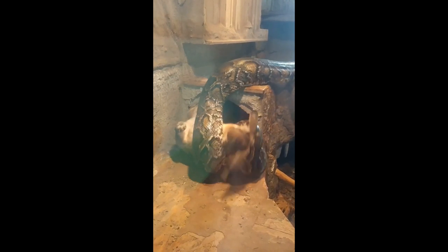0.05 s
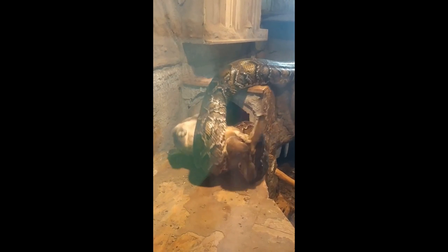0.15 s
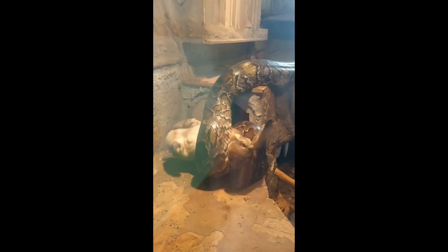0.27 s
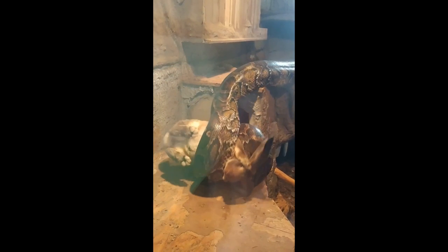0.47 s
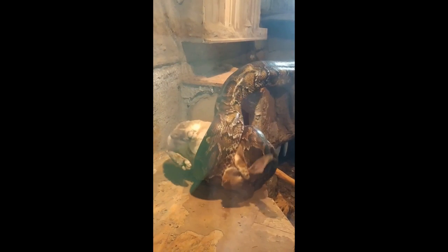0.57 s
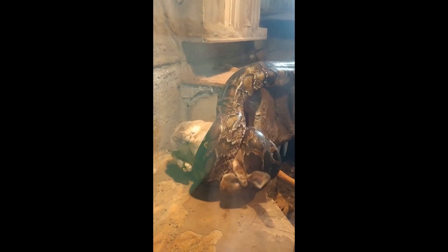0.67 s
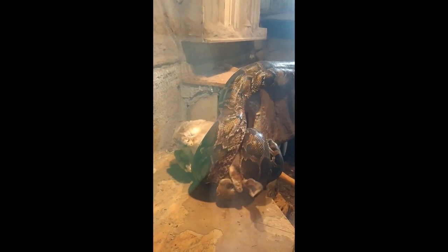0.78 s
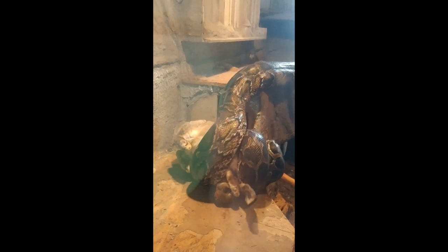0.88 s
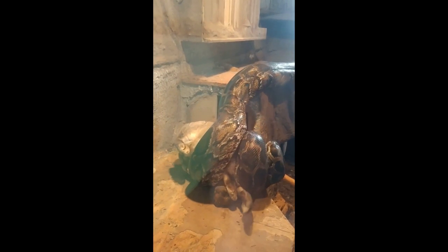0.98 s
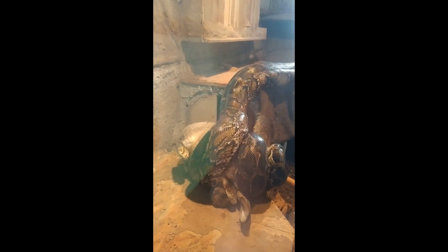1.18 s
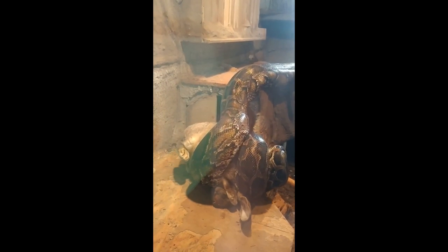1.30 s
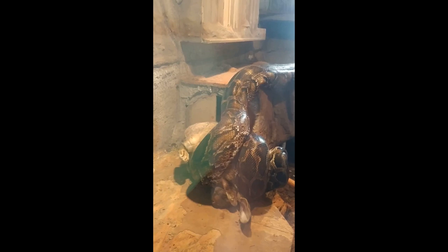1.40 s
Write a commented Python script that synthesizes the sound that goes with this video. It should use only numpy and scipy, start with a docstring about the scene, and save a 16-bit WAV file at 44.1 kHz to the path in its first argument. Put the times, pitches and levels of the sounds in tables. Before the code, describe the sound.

A rabbit's shrill squeals start at once as clean, rising whistles, tearing at about 0.2 s into a loud, raspy, wavering scream until 0.45 s. A falling whistle fades by 0.7 s. A second, higher scream runs from 0.8 to 1.25 s, turning pulsed near the end, while a body thumps the wall at 1.02 and, softer, 1.13 s. A brief squeal returns at 1.4 s. Small echoing tank, faint hum and hiss.

```python
"""A rabbit screams inside a small hard-walled tank, heard by a phone through the glass.
A faint room hum and hiss lie under everything. Clean whistles made of sine waves come first, then break
into a scream: a chaotic rasp of uneven pulses that rings the tank, with a strong wavering note on top.
More whistles lead into a second scream, which breaks into pulses late on. During it a body thumps twice
against the wall: each thump is a tap, a soft push and decaying wall tones with a rumble."""
import sys
import numpy as np
from scipy import signal
from scipy.fft import rfft, irfft
from scipy.io import wavfile
from scipy.ndimage import uniform_filter1d, minimum_filter1d

SR = 44100
rng = np.random.default_rng(int(sys.argv[2]) if len(sys.argv) > 2 else 0)


def wrap_up_sound(samples):
    """Save the sound to the file named by the first command line argument, as 16-bit audio."""
    columns = np.atleast_2d(samples).T
    # keep every value between -1 and 1, then stretch to whole-number steps
    tamed = np.clip(columns, -1, 1)
    steps = np.round(tamed * 32767).astype(np.int16)
    wavfile.write(sys.argv[1], SR, steps)


N = 63945
T = np.arange(N) / SR  # time in seconds
NOTE_WANDER_HZ, NOTE_FLUTTER_DB = 16, 2.4  # typical pitch and level wavering of the torn voice


def undb(db):
    """Turn decibels into a plain gain."""
    return 10 ** (np.asarray(db) / 20)


def unit(x):
    """Scale a sound to an average (RMS) level of 1."""
    return x / np.sqrt(np.mean(x ** 2))


def shape(table):
    """Gain at each frequency, drawn through (Hz, dB) points; almost silent outside them."""
    hz, db = np.array(table, float).T
    f = np.maximum(np.fft.rfftfreq(2 * N, 1 / SR), 1)
    return undb(np.interp(np.log(f), np.log(hz), db, left=-120, right=-120))


def filt(x, gain):
    """Colour a sound by multiplying its spectrum by a gain."""
    return irfft(rfft(x, 2 * N) * gain)[..., :N]


def walk(rate):
    """Smooth random wander with spread 1; a higher rate (Hz) wanders faster."""
    k = max(int(SR / rate), 1)
    return unit(uniform_filter1d(uniform_filter1d(rng.standard_normal(N), k), k))


def track(rows):
    """Draw each column of a table over time, with a gate that fades in and out over 4 ms."""
    rows = np.array(rows, float)
    inside = np.minimum(T - rows[0, 0], rows[-1, 0] - T)  # seconds from the nearer end
    gate = np.clip(inside / .004 + 1, 0, 1)
    return [np.interp(T, rows[:, 0], column) for column in rows.T[1:]], gate


def decay(t, t60):
    """Fade that drops by 60 dB in t60 seconds."""
    return np.exp(-np.log(1000) * t / t60)


def air(table, db, likeness):
    """Coloured noise with a slowly wavering level, partly shared by both microphones."""
    mid, side = filt(rng.standard_normal((2, N)), shape(table)) * undb(2 * walk(24))
    side_gain = np.sqrt((1 - likeness) / (1 + likeness))
    return undb(db) * (unit(mid) + side_gain * unit(side) * np.array([[1], [-1]]))


def hiss():
    """High noise, mostly alike on both sides."""
    # Colour of the hiss. Each row: frequency in Hz, relative level in dB.
    hiss_colour = [(1200, 3), (2000, -3), (8000, -7.5), (10000, -18.5), (13500, -5.5), (16000, -15)]
    return air(hiss_colour, -71, likeness=.7)


def hum():
    """Mostly low room noise that swells and dips."""
    # Colour of the hum. Each row: frequency in Hz, relative level in dB.
    hum_colour = [(25, -19.5), (59, -5), (199, -13), (253, -3.5), (394, -15), (430, -14), (994, -23),
                  (1500, -22), (1950, -42.5), (3300, -120)]
    # Swells and dips of the hum. Each row: time in seconds, level change in dB.
    swell = [(0, -3), (.13, 5), (.22, 0), (.35, 0), (.5, -3), (.62, -8.5), (.74, -3), (.82, 0.5),
             (.98, 9.5), (1.2, 0.5), (1.32, 5), (1.45, 3.5)]
    return air(hum_colour, -65, likeness=.3) * undb(np.interp(T, *np.array(swell).T))


def knock(t, hz, peak_s):
    """A brief sine wave whose strength rises to a peak after peak_s seconds, then dies away."""
    return np.sin(2 * np.pi * hz * t) * t / peak_s * np.exp(1 - t / peak_s)


def thumps():
    """A body hits the wall: a tap, a soft push, then the wall rings and rumbles on."""
    # The two hits. Each row: start in seconds, level in dB, ring and tap in dB relative to that level.
    hits = [(1.0243, -26.5, -13.5, -2.5), (1.1317, -32.5, -26, -10.5)]
    # Ringing tones of the wall. Each row: frequency in Hz, relative level in dB, time to fall 60 dB in seconds.
    wall = [(79.2, -3, 0.37), (141, -0.5, 0.58), (262, 4, 0.38), (401.6, -4, 0.23), (1080, -6.5, 0.11)]
    # Colour of the rumble. Each row: frequency in Hz, relative level in dB.
    rumble_colour = [(30, -12), (70, 10), (260, -4.5), (450, -1.5), (1000, -18), (1300, -6.5), (1450, -51)]
    # pairs hold the left side, then the right
    tap_lean_db, push_lean_db = np.array([[-11], [11]]), np.array([[-7], [7]])
    push_late_s = .00182 - np.array([[.00079], [0]])  # the push arrives earlier on the left
    wall_turn = np.array([[0], [.59]])  # radians: the wall's ring leads on the right

    rumble = undb(-8.5) * unit(filt(rng.standard_normal((2, N)), shape(rumble_colour)))
    out = 0
    for start, db, ring_db, tap_db in hits:
        t = np.maximum(T - start, 0)
        push_t = np.maximum(T - start - push_late_s, 0)
        tap = -undb(tap_db + tap_lean_db) * knock(t, hz=846, peak_s=.00031)
        push = undb(push_lean_db) * knock(push_t, hz=159, peak_s=.0022)
        ring = sum(undb(tone_db) * np.sin(2 * np.pi * hz * t + wall_turn) * decay(t, t60)
                   for hz, tone_db, t60 in wall)
        ring = undb(ring_db + 1.9 * walk(25)) * ring
        after = (ring + rumble * decay(t, .21)) * np.clip(t / .0019, 0, 1)  # builds up in 1.9 ms
        out = out + undb(db) * (tap + push + after)
    return out


def tank(x, wet_db):
    """Direct sound, late on the right, plus a short dense echo tail, different at each microphone."""
    # Balance between the sides. Each row: frequency in Hz, left minus right in dB.
    balance = [(1290, 2.5), (2380, 1.5), (4400, 2), (8120, 13), (15000, 21)]
    t60_s, build_s, right_lag_s = .22, .0037, .000025
    t = T[:SR // 2]
    tail = rng.standard_normal((2, len(t))) * decay(t, t60_s) * np.clip(t / build_s, 0, 1)
    tail = undb(wet_db) * tail / np.sqrt(np.sum(tail ** 2, axis=1, keepdims=True))
    f = np.fft.rfftfreq(2 * N, 1 / SR)
    direct = np.exp(-2j * np.pi * f * np.array([[0], [right_lag_s]]))  # a delay turns the phase
    # hold the end values down to 1 Hz and up to SR; each side takes half the difference
    lean = np.array([(1, balance[0][1])] + list(balance) + [(SR, balance[-1][1])])
    sides = np.array([shape(lean * [1, .5]), shape(lean * [1, -.5])])
    return filt(x, (direct + rfft(tail, 2 * N)) * sides)


def flap(depth):
    """Slower, unsteady flapping of the vocal folds that chops the sound; depth runs from 0 to 1."""
    flap_hz, wander_hz = 145, 18
    swing = np.cos(2 * np.pi * np.cumsum(flap_hz + wander_hz * walk(60)) / SR)
    return (1 + depth * undb(2 * walk(36)) * swing) / np.sqrt(1 + depth ** 2 / 2)


def throb():
    """Short dips that cut the late second scream into pulses."""
    throb_hz, from_s, one_dip_s, depth = 45, 1.02, 1.106, .8
    dip = np.cos(np.pi * throb_hz * (T - one_dip_s)) ** 4
    onset = np.clip((T - from_s) * throb_hz / 2, 0, 1)  # deepens over two pulses
    return 1 - depth * onset * dip


def fold_pulses():
    """Chaotic vocal folds: pulses of uneven spacing and size."""
    pulse_hz, jitter, scatter_db = 2574, .35, 4.5  # typical rate, spread of spacing (log), spread of size
    spacing_chance, size_chance = rng.standard_normal((2, N // 8))
    at = np.cumsum(SR / pulse_hz * np.exp(jitter * spacing_chance))
    keep = at < N - 2
    at, size = at[keep], undb(scatter_db * size_chance[keep])
    i, between = at.astype(int), at % 1
    pulses = np.zeros(N)
    # share each pulse between the two nearest samples
    np.add.at(pulses, i, size * (1 - between))
    np.add.at(pulses, i + 1, size * between)
    return pulses


def rasp():
    """Fold pulses pass through five throat bands and the tank's resonances."""
    # Rasp over time, one list per stretch. Each row: time in seconds,
    # then level in dB of the low, middle, upper, high and top bands.
    rasp_levels = ([(0.0, -55, -72.5, -56.5, -94, -93.5), (0.012, -60, -60.5, -68.5, -67.5, -82.5),
                    (0.1, -68, -71.5, -73, -87.5, -88), (0.12, -85.5, -60, -75.5, -95, -97.5),
                    (0.172, -83, -95, -87, -103, -72.5), (0.21, -79.5, -36.5, -56.5, -55.5, -65),
                    (0.26, -58, -29.5, -42, -48, -54), (0.416, -51.5, -24, -41, -45, -59.5),
                    (0.564, -71, -51, -61.5, -77.5, -83), (0.6, -51.5, -54, -52.5, -60.5, -74)],
                    [(0.6, -59.5, -64, -58, -66, -70.5), (0.614, -37, -49, -36.5, -67.5, -72),
                    (0.628, -38, -54, -54.5, -70, -77), (0.716, -65, -77, -76.5, -85, -88.5),
                    (0.74, -68, -80, -76.5, -88, -82.5)], [(0.74, -70, -74.5, -85.5, -76, -89),
                    (0.752, -48, -52, -42, -66, -89), (0.772, -52, -43, -44.5, -46, -68),
                    (0.798, -44.5, -48.5, -32.5, -53.5, -64), (0.824, -56, -35, -53.5, -58.5, -59),
                    (0.834, -51.5, -29.5, -38, -42.5, -70), (0.908, -63, -25, -37, -46.5, -57),
                    (0.99, -48.5, -24.5, -39.5, -38.5, -55.5), (1.042, -63.5, -28.5, -50, -36, -58.5),
                    (1.158, -48, -32, -36, -43.5, -49), (1.21, -33, -39, -43.5, -53.5, -73),
                    (1.308, -75.5, -68, -70, -99, -101), (1.37, -85, -107, -93, -94, -83)],
                    [(1.38, -59, -72.5, -74, -103, -89), (1.392, -62, -38, -51.5, -65, -85),
                    (1.416, -53, -44, -43, -71, -70), (1.442, -48, -38.5, -47, -62, -100),
                    (1.45, -84, -30, -48, -64, -95)])
    # Throat bands. Each row: frequency in Hz, relative gain in dB.
    low = [(1350, -48), (1550, -16.5), (1700, -17.5), (1950, 1), (2200, -4.5), (2500, -44.5)]
    middle = [(1700, -91.5), (2150, -7), (2500, 11), (2900, 0), (3200, -5), (3500, -32), (4000, -55.5)]
    upper = [(2900, -24.5), (3300, 2.5), (3500, 1), (3750, -10), (4050, -10), (4400, -8), (4800, -38)]
    high = [(3900, -40.5), (4400, 6.5), (4850, 0.5), (5200, 0.5), (6200, 3.5), (6500, -12.5), (6900, -34.5),
            (7400, -40.5)]
    top = [(6400, -6.5), (7200, -5.5), (7700, -1), (8300, 3.5), (8900, -4), (9300, -16), (9800, -39)]
    # Resonances of the tank. Each row: frequency in Hz, width in Hz, boost in dB.
    resonances = [(2290, 67, 3), (2768, 130, 7), (2846, 40, 13.5), (2990, 20, 11), (3084, 130, 10),
                  (3510, 120, 7.5), (3990, 220, 12), (4600, 48, 9.5), (5230, 220, 7), (5680, 210, 10),
                  (6290, 170, 8)]
    pulses = fold_pulses()
    f = np.fft.rfftfreq(2 * N, 1 / SR)
    ring = undb(sum(db / (1 + ((f - hz) / (width / 2)) ** 2) for hz, width, db in resonances))
    bands = [unit(filt(pulses, shape(band) * ring)) for band in (low, middle, upper, high, top)]
    out = 0
    for rows in rasp_levels:
        levels, gate = track(rows)
        out = out + gate * sum(undb(db + 1.5 * walk(90)) * band for db, band in zip(levels, bands))
    return out


def whistle(rows):
    """Clean voice: a slightly unsteady pitch and its overtones, each wavering in level."""
    (hz, *levels, rough_hz), gate = track(rows)
    phase = 2 * np.pi * np.cumsum(hz + np.abs(rough_hz) * walk(270)) / SR
    partials = sum(undb(db + 1.5 * walk(110)) * np.sin((k + 1) * phase) for k, db in enumerate(levels))
    return gate * np.sqrt(2) * partials


def whistles():
    """All the clean stretches of the voice together."""
    # Clean voice, one list per stretch. Each row: time in seconds, pitch in Hz,
    # level in dB of partials one to four, roughness of the pitch in Hz.
    clean_voice = [
        [(0.008, 2020, -68, -50, -86, -93, 29), (0.026, 2120, -53, -61.5, -83, -97, 54),
         (0.055, 2185, -37, -56, -71.5, -91, 40), (0.085, 2215, -38, -54, -68, -82, 25),
         (0.1, 2240, -45, -62, -68, -78, 25), (0.128, 2221, -28, -45.5, -68, -64.5, 54),
         (0.15, 2265, -46, -42, -61, -76.5, 12), (0.174, 2290, -25, -47, -74, -62, 36),
         (0.195, 2335, -27, -44.5, -70.5, -70, 16), (0.22, 2370, -29, -50, -52, -90.5, 30)],
        [(0.435, 2305, -52.5, -27, -68.5, -57.5, 9.4), (0.445, 2264, -32, -38.5, -55.5, -57.5, 14),
         (0.467, 2250, -30.5, -31, -56.5, -45.5, 14.7), (0.483, 2224, -26, -34.5, -55.5, -48, 7.8),
         (0.509, 2190, -26.5, -42.5, -62.5, -49.5, 3.2), (0.587, 2160, -26, -35, -62.5, -59.5, 11),
         (0.6, 2125, -44.5, -39.5, -47.5, -54, 33.6), (0.615, 2060, -30, -40.5, -49.5, -65, 58),
         (0.637, 2072, -38.5, -47.5, -56, -62.5, 35), (0.663, 2157, -42.5, -54.5, -77, -85, 4.6),
         (0.699, 2114, -50.5, -76, -68, -80, 8.6), (0.74, 2129, -70.5, -74, -85.5, -84, 7.7)],
        [(.79, 2099, -60.5, -39.5, -58.5, -55, 4.1), (.8, 2119, -38.5, -31.5, -48, -59, 8),
         (.818, 2144, -30, -34, -52, -64.5, 6), (.827, 2170, -26.5, -26, -62, -73.5, 11)],
        [(.757, 1396, -64.5, -52, -41.5, -51.5, 24), (.767, 1472, -68.5, -33.5, -41, -61, 38),
         (.78, 1508, -53, -32.5, -36.5, -59, 8), (.79, 1540, -46.5, -28, -49, -59.5, 19.5),
         (.81, 1566, -59, -31.5, -53, -74.5, 70)],
    ]
    return sum(whistle(rows) for rows in clean_voice)


def strand(rows):
    """A weaker side note of the torn voice, wandering in pitch and level."""
    (hz, db), gate = track(rows)
    phase = 2 * np.pi * np.cumsum(hz + NOTE_WANDER_HZ * walk(460)) / SR
    return gate * np.sqrt(2) * undb(db + NOTE_FLUTTER_DB * walk(75)) * np.sin(phase)


def note(rows):
    """One strong partial that wanders and flutters, and a rougher one about an octave up."""
    octave_hz, octave_wander_hz = 5104, 55
    (hz, db, octave_db), gate = track(rows)
    phase = 2 * np.pi * np.cumsum(hz + NOTE_WANDER_HZ * walk(500)) / SR
    octave_phase = 2 * np.pi * np.cumsum(octave_hz + octave_wander_hz * walk(370)) / SR
    pair = undb(db) * np.sin(phase) + undb(octave_db) * np.sin(octave_phase)
    return gate * np.sqrt(2) * undb(NOTE_FLUTTER_DB * walk(100)) * pair


def torn_voice():
    """The tones of the full screams: strong notes chopped by the flap, plus weaker side notes."""
    # Strong note of each scream. Each row: time in seconds, pitch in Hz, level in dB, upper note's level in dB.
    strong = [
        [(0.19, 2464, -38, -55.5), (0.228, 2637, -18, -48.5), (0.256, 2616, -12, -65), (0.314, 2695, -18, -67),
         (0.336, 2666, -27.5, -59), (0.366, 2655, -7, -58), (0.378, 2757, -24, -45), (0.386, 2600, -24, -46),
         (0.4, 2692, -13, -36.5), (0.432, 2738, -25.5, -33), (0.448, 2585, -17, -58), (0.47, 2770, -46, -61.5)],
        [(0.87, 3021, -29.5, -40.5), (0.9, 3021, -46, -56.5), (0.91, 3010, -21, -45.5),
         (0.932, 3009, -23.5, -39), (0.982, 3026, -12.5, -39), (1.0, 3032, -34.5, -37.5),
         (1.02, 3063, -22, -42), (1.076, 3030, -20, -40), (1.14, 3009, -18.5, -55), (1.165, 3000, -23, -50),
         (1.2, 3030, -23, -58), (1.254, 3003, -43, -83), (1.26, 2999, -46, -64)],
    ]
    # Weaker side notes. Each row: time in seconds, pitch in Hz, level in dB.
    side_notes = [
        [(.84, 2378, -36), (.89, 2380, -32), (.92, 2380, -40)],
        [(1.005, 3120, -34), (1.04, 3105, -25), (1.1, 3115, -29), (1.19, 3100, -29), (1.25, 3080, -44)],
        [(.24, 3440, -48), (.27, 3430, -35), (.36, 3500, -32), (.43, 3470, -36.5), (.45, 3430, -49.5)],
        [(.25, 3050, -45), (.33, 3110, -30), (.44, 3100, -29), (.47, 3110, -40)],
    ]
    return sum(note(rows) for rows in strong) * flap(.15) + sum(strand(rows) for rows in side_notes)


def scene():
    """Add up the hiss, the hum, the thumps and the voice in its tank."""
    pulsing = throb()
    harsh = rasp() * flap(.65) * np.sqrt(pulsing)
    tones = whistles() + torn_voice() * pulsing
    voice = tank(harsh, wet_db=2.5) + tank(tones, wet_db=-5)
    return hiss() + hum() + thumps() + voice


def record(dry):
    """The phone's limiter eases the loudest peaks, then the top is cut."""
    limit, limit_s, top_hz = .85, .006, 15760
    k = int(limit_s * SR)
    room = np.minimum(limit / (np.abs(dry).max(axis=0) + 1e-9), 1)  # gain that keeps each sample in bounds
    lowest = minimum_filter1d(room, 2 * k + 1)
    gain = uniform_filter1d(uniform_filter1d(lowest, k), k)  # eases in and out
    top_cut = signal.ellip(10, .2, 80, top_hz, fs=SR, output="sos")
    return signal.sosfilt(top_cut, dry * gain)


dry = scene()
out = record(dry)
wrap_up_sound(out)
```